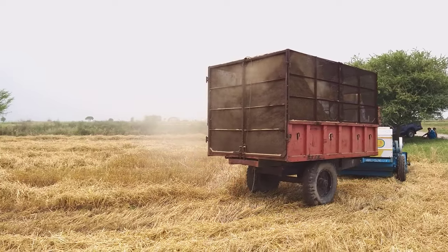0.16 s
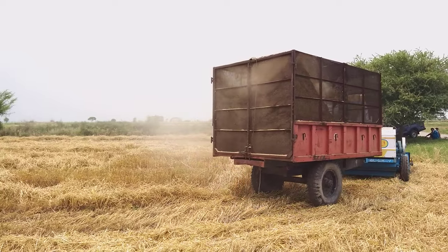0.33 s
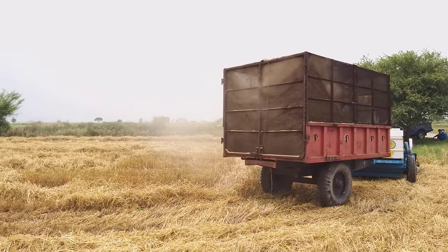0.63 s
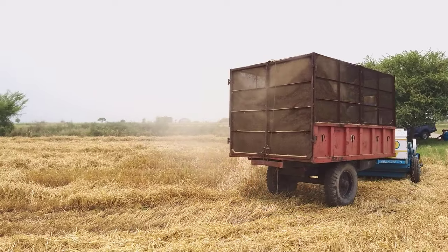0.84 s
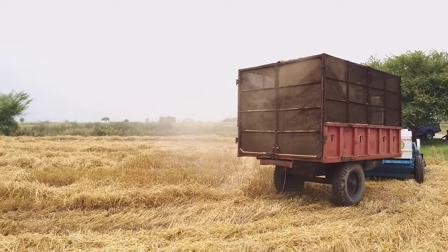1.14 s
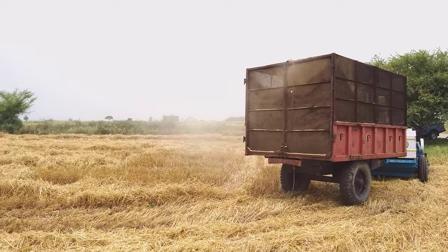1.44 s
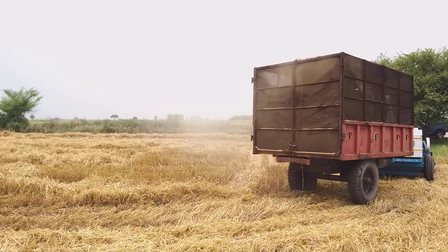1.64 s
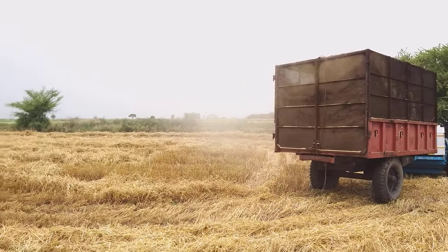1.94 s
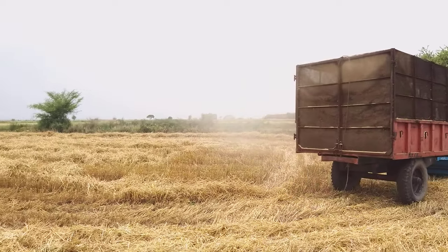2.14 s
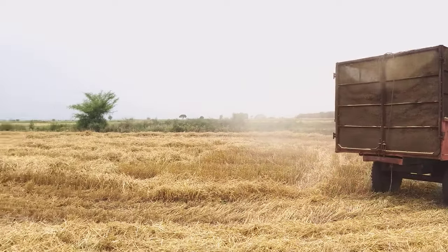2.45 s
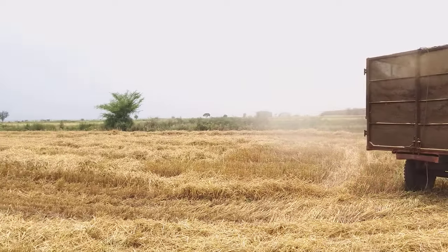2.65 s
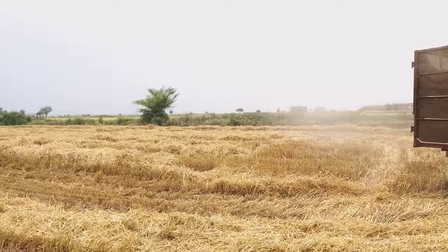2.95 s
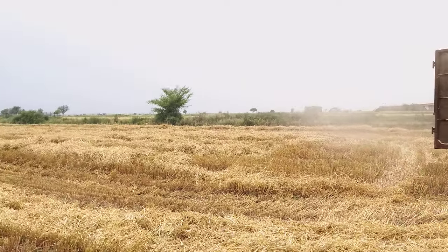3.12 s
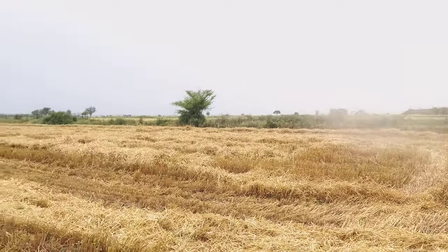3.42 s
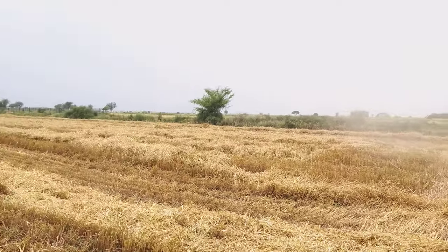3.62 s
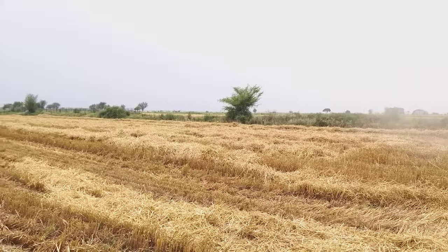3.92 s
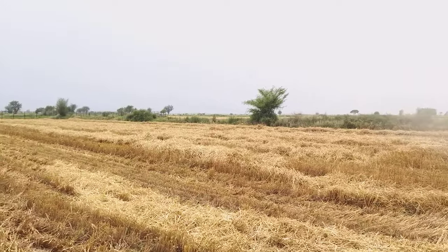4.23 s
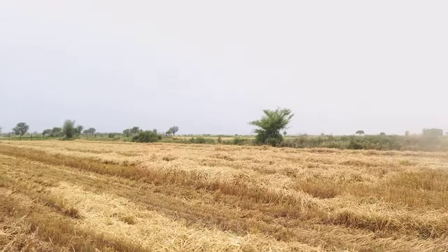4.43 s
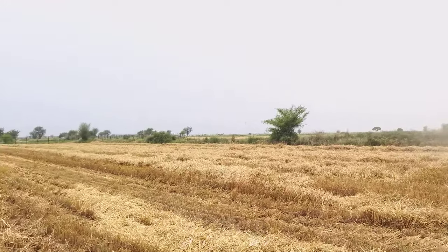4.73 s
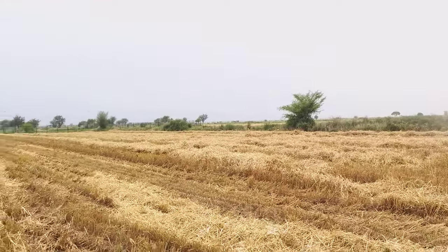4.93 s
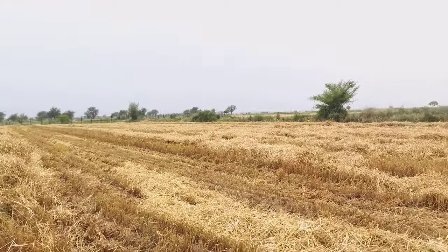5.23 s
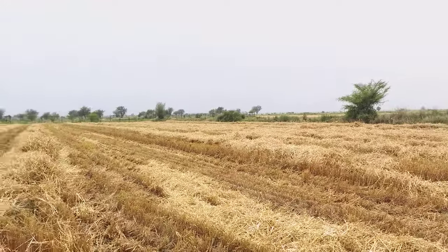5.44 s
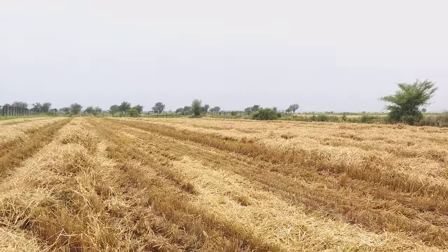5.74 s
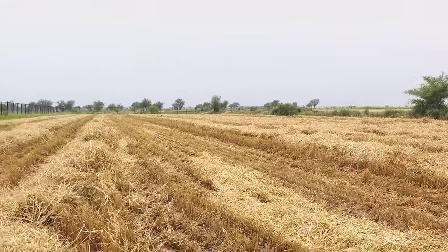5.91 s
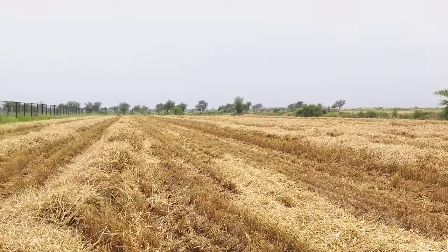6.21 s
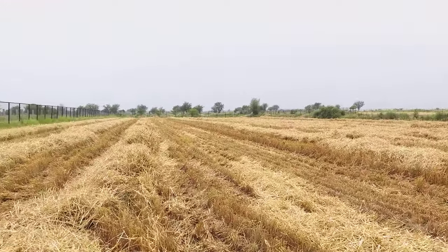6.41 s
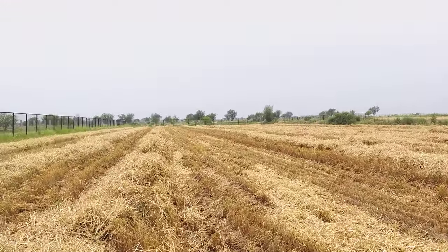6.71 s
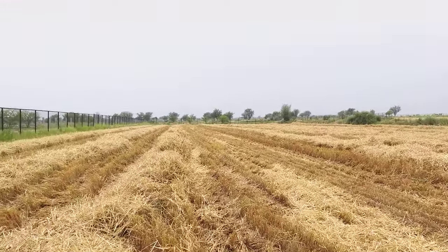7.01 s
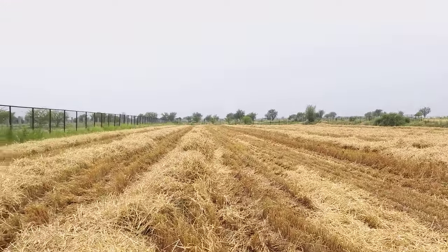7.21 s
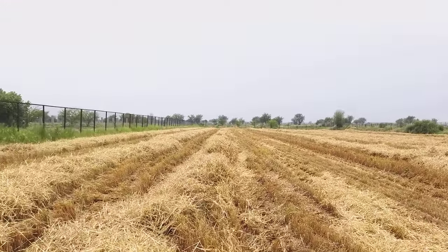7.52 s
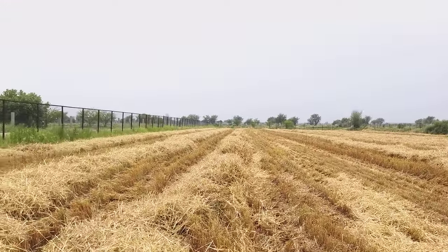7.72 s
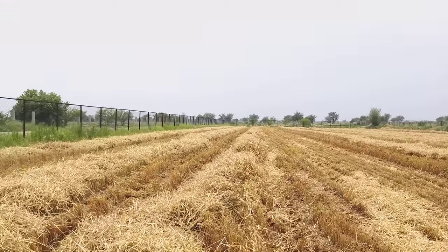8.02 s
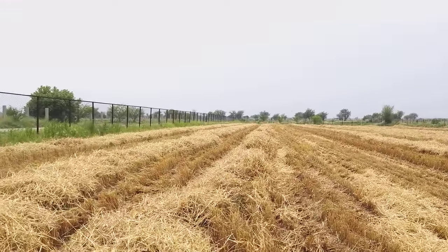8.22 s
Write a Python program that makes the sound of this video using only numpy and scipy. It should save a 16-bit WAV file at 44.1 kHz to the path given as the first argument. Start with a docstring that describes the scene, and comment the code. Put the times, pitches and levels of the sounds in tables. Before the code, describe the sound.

A tractor runs a straw chopper in an open field, with a steady diesel drone, a rotor whine and the hiss of flying chaff. A breeze buffets the microphone and small birds chirp faintly. The machine swings to the right as it slowly recedes, a gust slaps the right side, and dry stubble crunches and snaps underfoot. Later the hiss dulls while the drone carries on, a little quieter.

```python
"""A tractor drives a straw chopper across a harvested field: diesel drone, rotor whine, hissing chaff.
From the start a breeze buffets the microphone and small birds chirp. At 1.6-3 s the listener turns and
the receding machine swings to the right; dry stubble crunches from 2.7 s, and at 3.2 s an eddy slaps
the right microphone. Stalks snap underfoot from 4 s. Near 6 s the listener's body screens the hiss,
and the drone carries on, slowly fading."""
import sys
import numpy as np
from scipy import signal
from scipy.fft import rfft, irfft, next_fast_len
from scipy.io import wavfile
from scipy.ndimage import map_coordinates

SR = 44100
rng = np.random.default_rng(int(sys.argv[2]) if len(sys.argv) > 2 else 0)


def file_out(sig):
    """Save sig as 16-bit WAV at sys.argv[1]."""
    # one column per channel
    cols = np.atleast_2d(sig).T
    # limit, then scale
    lim = np.clip(cols, -1, 1)
    pcm = np.round(lim * 32767).astype(np.int16)
    wavfile.write(sys.argv[1], SR, pcm)


N = 368676

# direction of the machine: (time [s], bearing [0 ahead, 1 beside], lead of the right ear [ms])
DIRECTION = [(0, 0.19, 0.061), (1.6, 0.27, 0.12), (3, 0.78, 0.25), (4.5, 0.89, .38), (6, 1, 0.43),
             (8.36, 1, 0.39)]


def engine(cycle, beam_db=1.5, beam_db_per_order=0.84):
    """Harmonic series of the engine cycle; by directivity, higher orders beam more narrowly."""
    # exhaust boom: (time [s], relative level [dB])
    boom_levels = [(0.0, -27.5), (0.16, -25.5), (0.21, -32), (0.67, -26), (0.81, -36), (0.91, -25),
                   (2.14, -22), (2.21, -24.5), (4.17, -23.5), (4.51, -28.5), (5.08, -22), (5.45, -29.5),
                   (5.87, -24.5), (6.19, -30), (6.33, -26.5), (8.06, -30), (8.15, -27), (8.36, -26)]
    # harmonics: (order before rounding [cycle rates], on-beam level [dB], aim along the path [0-1])
    harmonics = [(2, -43.5, .05), (3, -40, 0), (4, -38.5, 0), (5, -42, 0), (8.7, -29.5, 0.32),
                 (10, -41, 0.8), (11.1, -36.5, 0.1), (12.1, -30.8, .45), (15, -45.5, 0.24),
                 (16, -44.5, 0.77), (18.5, -38.3, .57), (24.2, -43, 0.25), (26, -45, 1), (26.8, -40, .17),
                 (30.007, -42.5, 0), (36, -44.5, 0.08), (38.68, -42.5, 0.3)]
    boom = partial(6 * cycle, curves(boom_levels)[0] - .3, flutter=0.038)
    drone = boom + rotor_whine(cycle)
    for order, db, aim in harmonics:
        on_firing = round(order) % 3 == 0  # multiples of the firing rate are steadier
        off_beam_db = (beam_db + beam_db_per_order * order) * np.abs(path_fraction() - aim)
        drone += partial(round(order) * cycle, db - off_beam_db, flutter=.24 if on_firing else .8)
    return drone


def rotor_whine(cycle, direct_db=-34.6, path_loss_db=11.5, swell_s=1.5, period_s=2.37):
    """Interference: a reflection drifts in and out of phase with the fading rotor tone."""
    reflection = .26 * np.exp(2j * np.pi * (clock() - swell_s) / period_s)
    db = direct_db - path_loss_db * path_fraction() + 20 * np.log10(np.abs(1 + reflection))
    return partial(33 * cycle, db, flutter=0.23)


def chopper(firing):
    """Amplitude modulation: drum and trailer rumble, knives and engine clatter, pulse at each firing."""
    # drum and trailer: (frequency [Hz], spectral density [dB])
    rumble_spectrum = [(20, -36), (33, -9), (48, -16.5), (80, -2.5), (125, -2.5), (190, -1), (270, -0.5),
                       (330, -8.5), (400, -11), (480, -17), (700, -20), (1000, -46), (2000, -70)]
    # knives and engine: (frequency [Hz], spectral density [dB])
    clatter_spectrum = [(250, -19), (400, -0.5), (520, -3.5), (680, 1), (900, 1), (1050, -5.5), (1400, -5),
                        (1900, -13), (3000, -27)]
    rumble_db, clatter_db, _ = machine_levels()
    beat = np.cos(2 * np.pi * firing)
    feed = amp(0.58 * wobble(7))  # straw reaches the knives unevenly
    rumble = amp(rumble_db) * unit(noise(rumble_spectrum, channels=1)[0] * (1 + 0.31 * beat))
    clatter = amp(clatter_db) * unit(noise(clatter_spectrum, channels=1)[0] * (1 + 0.22 * beat))
    return feed * (rumble + clatter)


def chaff(direct_gain=0.46, resonance_sag=.05):
    """Impact noise: bits of straw excite the chute's resonances, whose colour shifts with bearing."""
    # chute heard from ahead and from beside: (frequency [Hz], left gain [dB], right gain [dB])
    ahead_spectrum = [(1100, -8, -23), (2030, -13, -15), (2360, -15, -5), (3400, -4, -7.5),
                      (3900, -14, -4.5), (4440, -2.5, -2.5), (4800, -5, -7), (6560, -3.5, 2.5),
                      (7600, -10.5, -5), (9300, -6.5, -8), (10260, -23, -2), (11460, -2, 1),
                      (14500, -11.5, -21), (15700, -14.5, -23)]
    beside_spectrum = [(1130, -30, -34), (2010, -3, -1.5), (2500, -23, -4), (3100, -2, 1),
                       (4100, -13, -11.5), (4900, -16, -4), (6080, -6, 2.5), (7600, -11, -6),
                       (9700, -14, -5.5), (12000, -7, -1), (14000, -15, -2.5), (15800, -14.5, -6)]
    bearing, lead_ms = curves(DIRECTION)
    spray = rng.standard_normal((2, N)) + .5 * crackle(2500, spread_db=5.0)
    spray += direct_gain * from_right(rng.standard_normal(N), lead_ms)
    sinking = np.cumsum(1 - resonance_sag * bearing)  # resonances sink as the chute swings aside
    ahead = np.array([map_coordinates(ear, [sinking], mode="nearest")
                      for ear in coloured(spray, ahead_spectrum)])
    beside = coloured(spray, beside_spectrum)
    hiss = np.sqrt(1 - bearing) * unit(ahead) + np.sqrt(bearing) * unit(beside)
    _, _, chaff_db = machine_levels()
    return amp(chaff_db + 0.55 * wobble(14)) * hiss


def machine_levels(trailer_shadow_db=4.5, body_shadow_db=5, shadow_s=5.98, shadow_rise_s=0.46):
    """Distance loss and acoustic shadow: all fades; the trailer screens clatter, the listener chaff."""
    path, bearing = path_fraction(), curves(DIRECTION)[0]
    screened = (1 + np.tanh((clock() - shadow_s) / shadow_rise_s)) / 2
    rumble_db = -28 - 3.5 * path
    clatter_db = -34 - 4.5 * path - trailer_shadow_db * bearing
    chaff_db = -31.2 - 10 * path - body_shadow_db * screened
    return rumble_db, clatter_db, chaff_db


def field_scatter():
    """Diffuse scattering: the field returns machine noise; its mids fade slower than direct sound."""
    # steady diffuse hiss: (frequency [Hz], spectral density [dB])
    hiss_spectrum = [(500, -10), (1100, -8), (1800, 1.5), (2500, -2), (3200, -4), (4500, 0), (6500, -29),
                     (8500, -35), (12000, -12), (15500, -12.5)]
    rumble_db, clatter_db, _ = machine_levels()
    low = noise([(20, -22), (45, -9), (80, 4), (150, -13), (300, -29), (450, -1), (700, -10),
                 (1200, -49)], channels=2)
    mid = noise([(500, -28, -20), (960, 3.5, -26), (1340, 5, -19), (1890, 3, -5), (2640, -15, -20)],
                channels=2)
    hiss = noise(hiss_spectrum, channels=2)
    return amp(rumble_db - 24.5) * low + amp(0.62 * clatter_db - 23.11) * mid + amp(-45) * hiss


def wind(breeze_db=-49):
    """Turbulent pressure buffets mainly the right microphone; the strongest eddy pushes, then pulls."""
    # turbulence: (frequency [Hz], spectral density [dB])
    buffet_spectrum = [(20, -22), (45, -3), (80, 5), (130, 1), (200, -1), (320, -14.5), (550, -21),
                       (1200, -52)]
    # gusts on the right: (time [s], half width [s], level [dB])
    gusts = [(.15, .2, -35), (1.52, 0.056, -24), (1.97, 0.21, -25.5), (2.77, .08, -23.5), (3.13, .08, -22),
             (3.34, 0.047, -21.5), (3.76, 0.057, -32), (5.52, .07, -34), (6.59, .05, -27.5),
             (6.86, 0.05, -27.5)]
    # strongest eddy: (time [s], peak level [dB], half width [s])
    eddy = (3.228, -5, .0011)
    lumps = unit(noise(buffet_spectrum, channels=2) * amp(3.9 * wobble(30)))
    buffeting = (amp(breeze_db) + swells(gusts)) * lumps * amp([[-10], [0]])
    s, db, width = eddy
    passage = (clock() - s) / width
    slap = -amp(db) * passage * np.exp((1 - passage ** 2) / 2)
    return buffeting + slap * np.array([[0], [1]])


def footsteps(snap_t60_s=0.016):
    """Brittle fracture: dry straw crunches in clumps underfoot; single stalks snap in short bursts."""
    # feet shifting in the straw: (time [s], half width [s], relative level [dB])
    steps = [(2.72, 0.01, -38), (3.62, 0.074, -41), (4.02, 0.14, -38), (4.09, 0.0084, -34.5),
             (4.385, .032, -31), (5.26, 0.087, -35), (5.73, 0.041, -42), (6.11, 0.079, -36),
             (7.03, 0.077, -37.5), (7.2, 0.03, -40), (7.34, 0.043, -45.5), (7.46, .025, -41.5),
             (8.22, 0.11, -42.5)]
    # breaking stalks: (time [s], level [dB], brightness [0 thick stalk, 1 thin])
    breaks = [(4.088, -34, 0.35), (5.286, -30, 0.11), (5.298, -25, 0.18), (5.413, -26, .1),
              (5.418, -24.5, .15), (5.577, -31, .1), (5.683, -24, .9), (6.524, -37, 0.092)]
    # crushed stubble, thick stalk and thin stem: (frequency [Hz], spectral density [dB])
    stubble_spectrum = [(400, -34), (1100, 2.5), (3000, 5), (5000, 5), (7000, -1), (9500, 0), (12500, 9),
                        (14500, 2), (15800, -10)]
    thick_spectrum = [(300, -18), (750, 0), (1200, 3), (2000, -14), (3200, -6), (5200, -11), (7000, -18),
                      (15000, -15)]
    thin_spectrum = [(1500, -25), (2400, 6), (3300, -14), (5000, -12), (6000, -2), (7500, -21),
                     (15000, -23)]
    pressure = amp(1.2 * wobble(90)) * swells(steps)
    fractures = rng.standard_normal((2, N)) + .7 * crackle(1300, spread_db=2.2)
    crunch = pressure * unit(coloured(fractures, stubble_spectrum)) * amp([[1.5], [-1]])
    thick = noise(thick_spectrum, channels=1) + 0.92 * noise(thick_spectrum, channels=2)
    thin = noise(thin_spectrum, channels=1)
    t = clock()
    for s, db, brightness in breaks:
        decay = amp(db - 60 * np.abs(t - s) / snap_t60_s) * (t >= s)
        crunch += decay * (thick + brightness * (thin - thick))
    return crunch


def birds(sweep_octaves_per_s=24, turn_s=0.00496, rasp=.047, second_voice_db=-12, echo_t60_s=0.23):
    """Frequency modulation: both sides of the syrinx slur up and down; foliage adds reverberation."""
    # calls: (time [s], length [s], top pitch [Hz], place of the top [0-1], relative level [dB])
    calls = [(0.344, 0.028, 4100, 0.16, -41), (1.213, .027, 3400, .4, -37.5),
             (2.803, 0.033, 3900, 0.22, -35.5), (3.224, .025, 3200, .3, -36.5),
             (3.527, 0.034, 5370, 0, -39), (3.553, 0.042, 3750, 0.26, -36.5), (3.884, .028, 3000, 0.4, -41),
             (4.2, .028, 3000, .35, -43), (4.298, 0.047, 3100, .47, -41), (4.787, .018, 6200, 0, -39),
             (4.8, .03, 4800, .05, -31.5), (5.395, 0.024, 3330, 0.56, -32), (5.852, .027, 3500, 0.64, -42),
             (5.945, .027, 2400, .4, -45), (6.247, 0.032, 3710, 0.21, -31), (6.589, 0.039, 3830, 0.7, -36),
             (6.639, 0.035, 3450, 0.37, -32.5), (6.948, 0.029, 5100, 0, -36.5),
             (6.971, 0.034, 3400, .45, -32.5), (7.302, .025, 2940, 0.3, -40), (7.321, .02, 3450, 1, -41),
             (7.797, 0.057, 3210, 0.43, -42), (8.13, .022, 4400, .5, -43), (8.17, 0.039, 4300, 0.58, -35.5)]
    song = np.zeros(N)
    waver = 1 + rasp * wobble(450)
    tremble = amp(2.2 * wobble(200))
    for s, length, pitch, top, db in list(calls) + distant_calls(count=7):
        progress = np.linspace(0, 1, int(length * SR))
        span = slice(int(s * SR), int(s * SR) + len(progress))
        from_top_s = np.hypot((progress - top) * length, turn_s) - turn_s  # rounds the pitch peak
        hz = pitch * 2 ** (-sweep_octaves_per_s * from_top_s) * waver[span]
        phase = 2 * np.pi * np.cumsum(hz) / SR
        voices = np.sin(phase) + amp(second_voice_db) * np.sin(rng.uniform(.8, .9) * phase)
        envelope = amp(db + 4.5) * np.sqrt(np.abs(np.sin(np.pi * progress)))
        song[span] += envelope * tremble[span] * voices
    t = np.arange(SR // 3) / SR
    tail = rng.standard_normal((2, len(t))) * amp(-60 * t / echo_t60_s)
    leaves = signal.fftconvolve(song[None], tail / np.linalg.norm(tail[0]), axes=1)[:, :N]
    return (from_right(song, lead_ms=0.407) + amp(-9) * leaves) * amp([[-8], [2]])


def distant_calls(count, from_s=3.8, length_s=.028, centre_hz=2810, relative_db=-47):
    """Rows of faint, randomly timed distant bird chirps, spread over half an octave."""
    window_s = N / SR - .2 - from_s
    return [(from_s + when * window_s, length_s, centre_hz * 2 ** ((pitch - .5) / 2), top, relative_db)
            for when, pitch, top in rng.random((count, 3))]


def partial(turns, db, flutter):
    """A tone of rms level db whose amplitude and phase flutter with the load."""
    sway = (1 + flutter * (wobble(9) + 1j * wobble(9))) / np.sqrt(1 + 2 * flutter ** 2)
    return np.sqrt(2) * amp(db) * np.real(sway * np.exp(2j * np.pi * (turns + rng.random())))


def from_right(x, lead_ms):
    """Interaural time difference: a mono sound reaches the right ear first."""
    shift = lead_ms * SR / 2000  # half the lead for each ear, in samples
    return np.array([map_coordinates(x, [np.arange(N) + side * shift], mode="nearest")
                     for side in (-1, 1)])


def crackle(rate, spread_db):
    """Shot noise: tiny impacts of uneven size in both ears, rms 1."""
    hits = rng.random((2, N)) < rate / SR
    return unit(hits * rng.standard_normal((2, N)) * amp(spread_db * rng.standard_normal((2, N))))


def noise(spectrum, channels):
    """Coloured noise of rms 1, uncorrelated between channels."""
    return unit(coloured(rng.standard_normal((channels, N)), spectrum))


def coloured(x, spectrum):
    """Spectral shaping by rows of (frequency [Hz], gain [dB]), or with one gain for each ear."""
    knots_hz, *gains_db = np.transpose(spectrum)
    return filtered(x, lambda hz: amp([np.interp(np.log(hz + 1), np.log(knots_hz), db)
                                       for db in gains_db]))


def filtered(x, response):
    """Linear filtering: the spectrum of x times a frequency response."""
    size = next_fast_len(N + SR // 4)
    return irfft(rfft(x, size) * response(np.fft.rfftfreq(size, 1 / SR)), size)[..., :N]


def swells(rows):
    """Sum of Gaussian envelopes from rows of (time [s], half width [s], level [dB])."""
    t = clock()
    return sum(amp(db) * np.exp(-.5 * ((t - s) / width) ** 2) for s, width, db in rows)


def wobble(rate):
    """A smooth random curve, rate knots a second."""
    return map_coordinates(rng.standard_normal(int(N * rate / SR) + 4), [clock() * rate])


def curves(rows):
    """Linear interpolation of each column after the time, one value per sample."""
    times, *columns = np.transpose(rows)
    return [np.interp(clock(), times, column) for column in columns]


def path_fraction():
    """Uniform motion: how far the machine has crept along its path, 0-1."""
    return np.linspace(0, 1, N)


def clock():
    """Time of every sample in seconds."""
    return np.arange(N) / SR


def amp(db):
    """Decibels to gain."""
    return 10 ** (np.asarray(db) / 20)


def unit(x):
    """Scale to rms 1."""
    return x / np.sqrt(np.mean(x ** 2) + 1e-20)


def scene():
    """Superposition of the machine, placed by its bearing, and the field around it."""
    # engine speed: (time [s], firing rate [Hz])
    firing_rates = [(0, 72.23), (.6, 72.7), (1.5, 73.37), (2.5, 73.5), (3.2, 73.78), (3.9, 73.6),
                    (4.5, 73.72), (6, 73.44), (8.36, 73.62)]
    firing = np.cumsum(curves(firing_rates)[0] * (1 + 0.00096 * wobble(6))) / SR  # phase in turns
    cycle = firing / 3  # three firings to an engine cycle
    _, lead_ms = curves(DIRECTION)
    machine = from_right(engine(cycle) + chopper(firing), lead_ms) * amp([[-.35], [.35]])
    return machine + field_scatter() + chaff() + wind() + footsteps() + birds()


def record(dry):
    """Band limiting: the microphone sheds the deepest bass and the highest treble."""
    low_hz, top_hz = 28, 15950
    return filtered(dry, lambda hz: (hz < top_hz) * hz ** 4 / (hz ** 4 + low_hz ** 4))


dry = scene()
out = record(dry)
file_out(out)
```